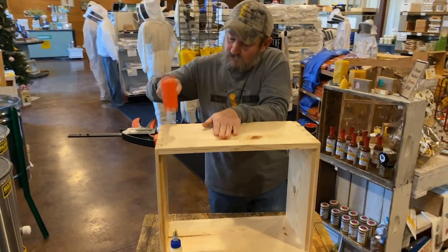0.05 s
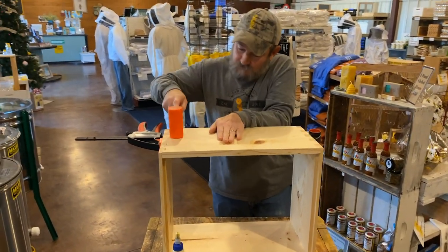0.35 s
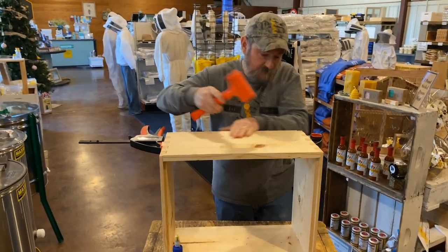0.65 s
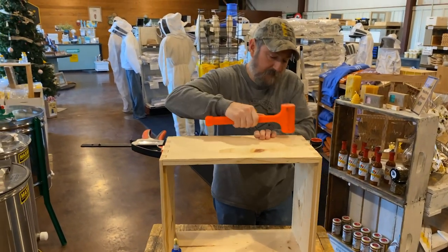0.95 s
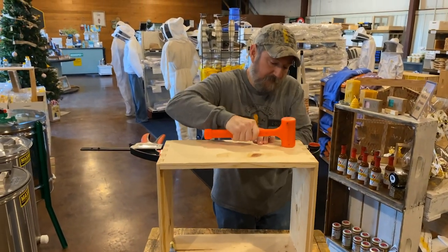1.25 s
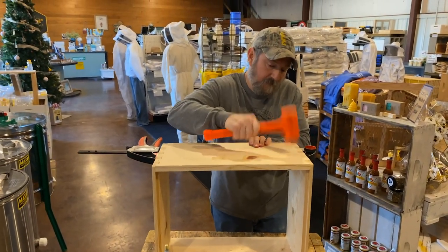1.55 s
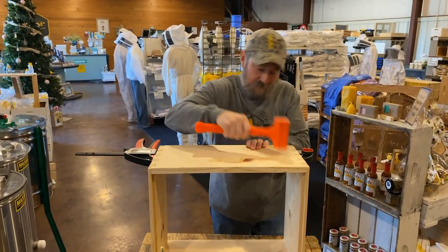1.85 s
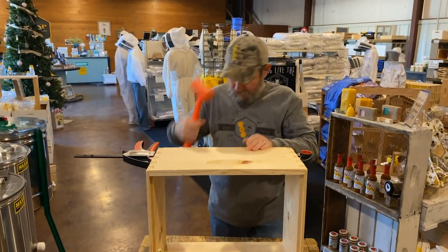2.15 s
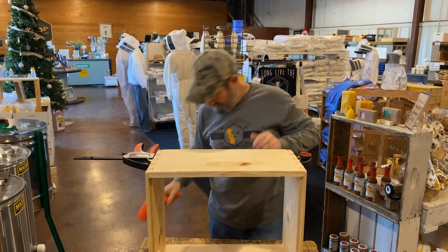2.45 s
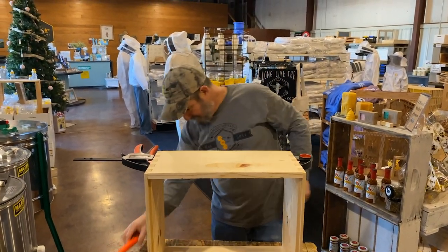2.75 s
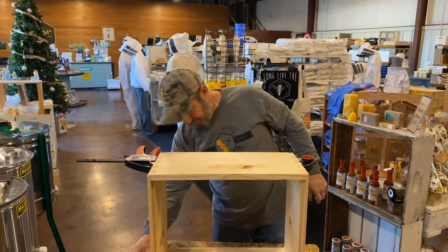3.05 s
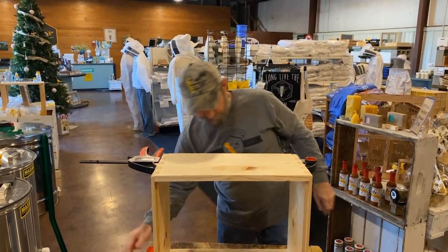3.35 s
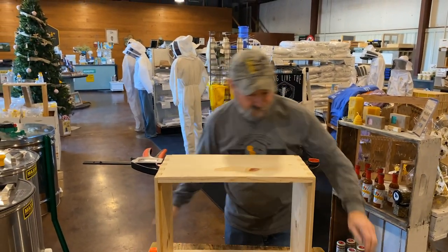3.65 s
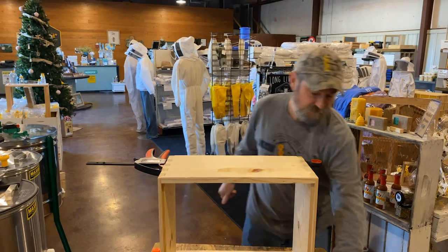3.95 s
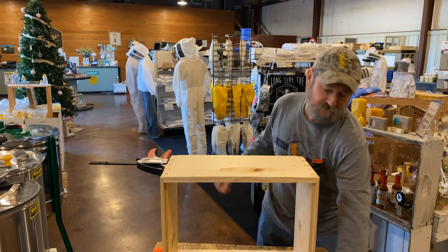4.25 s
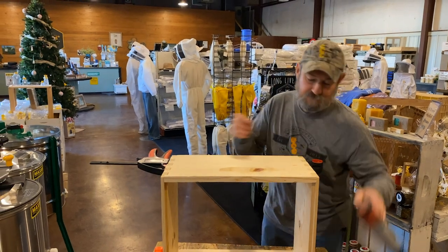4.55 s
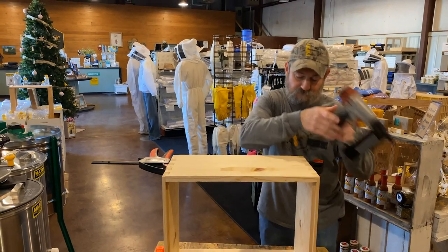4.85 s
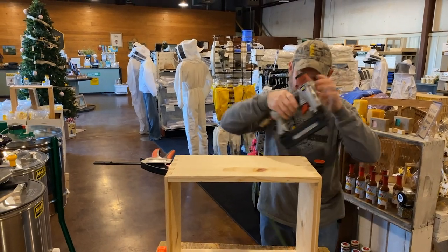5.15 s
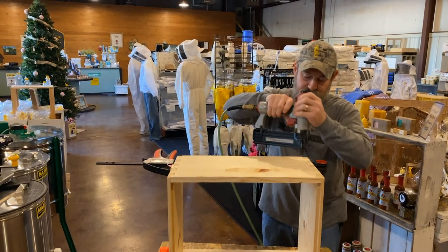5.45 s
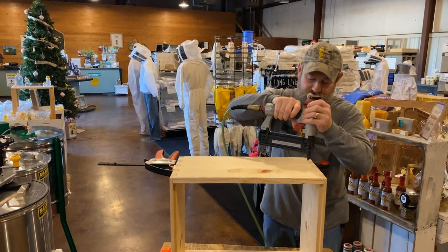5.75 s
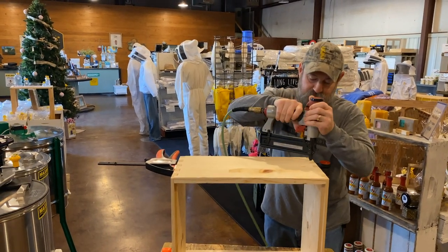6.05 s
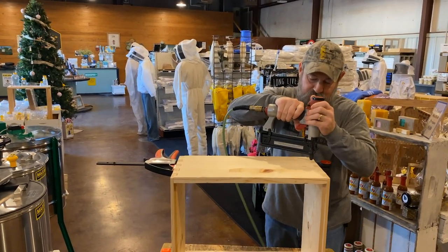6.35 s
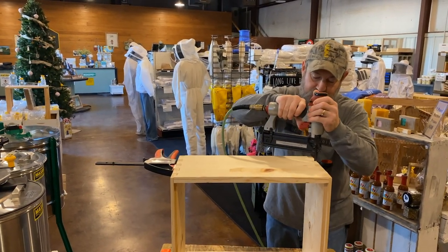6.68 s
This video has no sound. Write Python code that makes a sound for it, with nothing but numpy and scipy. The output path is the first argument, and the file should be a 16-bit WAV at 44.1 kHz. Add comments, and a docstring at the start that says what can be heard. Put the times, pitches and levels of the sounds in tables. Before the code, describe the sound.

Three mallet blows on wood, a rattling clunk as it is set down, and one sharp air stapler shot in a large room.

```python
"""Mallet and air stapler in a workshop

A shot-filled rubber mallet strikes a pine box three times, exciting its modes, and is laid on the bench.
An air stapler is lifted on its hose, pressed on the box and fired: valve hiss, driver blow, exhaust,
piston return. The hall adds reverberation and a far-wall echo over ventilation rumble, and the loud
blows overload the microphone."""
import sys
import numpy as np
from scipy import signal
from scipy.fft import rfft, irfft, next_fast_len
from scipy.io import wavfile

SR = 44100
rng = np.random.default_rng(int(sys.argv[2]) if len(sys.argv) > 2 else 0)


def int16_out(signal):
    """Quantize to a 16-bit WAV file."""
    q = np.round(np.clip(np.atleast_2d(signal).T, -1, 1) * 32767)
    wavfile.write(sys.argv[1], SR, q.astype(np.int16))


N = 296084
T = np.arange(N) / SR
AGE = T[:SR]  # seconds since an impact

# modes of the pine box: pitch_hz, t60_s, first_spot_db, second_spot_db, third_spot_db
BOX_MODES = [(132, 0.18, -1, -29.5, -26), (172, 0.45, -4.5, -13, -12), (191.4, .06, -7, -11, -14),
             (250, 0.11, 5, -8.5, -6.5), (305, .09, 0, -17, -7), (392, 0.088, -19.5, -5, -7),
             (490, 0.1, -12, -9, 1), (540, 0.1, -12, 1, -9.5), (590, 0.16, -7, -6, -9),
             (696, 0.16, -7, 1.5, -4), (732, 0.12, -17, -9, -5.5), (786, 0.1, -8, -10, -7.5),
             (879, .16, -18, -4.5, -19), (1084, 0.057, -4, -12.5, -13), (1356, 0.15, -17, -8, -8),
             (1670, 0.12, -13, -13.5, -7.5)]
# modes of the stapler's steel body: pitch_hz, t60_s, level_db
STEEL_MODES = [(1960, 0.026, 0.5), (2300, 0.027, -3.5), (3543, 0.025, 3), (4290, 0.025, -9),
               (7500, 0.021, -12), (8242, 0.028, -6)]
# spectrum of a small hard click: frequency_hz, level_db
CLICK_SPECTRUM = [(200, -16), (1000, -1.5), (3500, 3), (5000, -5), (8000, 0.5), (11000, -3.5),
                  (16000, -18.5)]


def undb(db):
    """Amplitude ratio of a level in decibels."""
    return 10 ** (np.asarray(db) / 20)


def fade(t, t60):
    """Exponential decay from t = 0, falling 60 dB in t60 seconds."""
    return (t >= 0) * np.exp(-np.log(1000) * np.maximum(t, 0) / t60)


def add(track, start_s, sound):
    """Superposition: a sound sums into the track from start_s on."""
    i = max(int(start_s * SR), 0)
    track[i:i + len(sound)] += sound[:len(track) - i]


def along(points, hz, axis=1):
    """Interpolation of a table column over log frequency."""
    points = np.array(points, float)
    return np.interp(np.log(np.maximum(hz, 1)), np.log(points[:, 0]), points[:, axis])


def noise(spectrum, size):
    """Spectral shaping of white noise, scaled to unit rms."""
    n = next_fast_len(size, True)
    gain = undb(along(spectrum, np.fft.rfftfreq(n, 1 / SR)))
    y = irfft(rfft(rng.standard_normal(n)) * gain, n)[:size]
    return y / y.std()


def split(x):
    """Complementary half-octave bands that sum to x, as (centre_hz, band) pairs."""
    centres = 44 * 2 ** np.arange(0, 9, .5)
    hz, whole = np.fft.rfftfreq(len(x), 1 / SR), rfft(x)
    return [(c, irfft(whole * np.interp(hz, centres, centres == c), len(x))) for c in centres]


def burst(spectrum, t60, damping, smoothing=0):
    """Dense modes decay like noise; t60 holds at 1 kHz and varies as frequency ** -damping."""
    t = AGE[:SR // 3]
    bands = split(noise(spectrum, len(t)))
    y = sum(band * fade(t, t60 * (1000 / hz) ** damping) for hz, band in bands)
    rms = y.std()
    hz = np.maximum(np.fft.rfftfreq(len(t), 1 / SR), 30)
    even = undb(along(spectrum, hz)) * (1000 / hz) ** (damping / 2)
    taper = np.clip(2 - 3 * t / t[-1], 0, 1)
    for _ in range(smoothing):  # modal overlap: in a large body no peak stands out
        phase = np.angle(rfft(y))
        y = irfft(even * np.exp(1j * phase), len(t)) * taper
    return y * rms / y.std()


def ring(modes):
    """Free vibration: damped sines of alternating sign, from rows of pitch_hz, t60_s, level_db."""
    return sum((-1) ** k * undb(db) * fade(AGE, t60) * np.sin(2 * np.pi * hz * AGE)
               for k, (hz, t60, db) in enumerate(modes))


def swell(start_s, length_s, db, attack_s=.045, release_t60=.28):
    """Envelope of a sustained excitation: linear rise, hold, exponential decay."""
    rise = np.clip((T - start_s) / attack_s, 0, 1)
    return undb(db) * rise * fade(np.maximum(T - start_s - length_s, 0), release_t60)


def stick_slip(per_s=35, spread_db=2):
    """Stick-slip friction: the gain of a rubbing contact wavers at random."""
    marks = np.arange(0, T[-1], 1 / per_s)
    return undb(spread_db * np.interp(T, marks, rng.standard_normal(len(marks))))


def background(vent_db=-35.5, hiss_db=-63.5, drop_db=9, drop_start_s=3.7, drop_length_s=1.2):
    """Broadband noise: steady ventilation rumble, and a thin hiss that sinks once."""
    # spectra of the ventilation and the hiss: frequency_hz, level_db
    vent = [(15, -58), (28, -25), (42, -3.5), (58, 1.5), (90, -3), (125, -9.5), (230, -15.5), (330, -25.5),
            (500, -31.5), (750, -33.5), (1500, -41.3), (3000, -42.3), (6000, -50.8), (16000, -59.5)]
    hiss = [(5000, -27.5), (8000, -9.5), (9000, -0.5), (9900, -3.5), (10600, -24), (14000, -17),
            (15000, -4.5), (16000, -22)]
    sunk = np.clip((T - drop_start_s) / drop_length_s, 0, 1)
    return undb(vent_db) * noise(vent, N) + undb(hiss_db - drop_db * sunk) * noise(hiss, N)


def hall(x, gap_s=.02, build_s=.022, near_t60=.57, echo_s=.18, echo_t60=.5):
    """Convolution with a room response: early scattering, diffuse decay and a smeared far-wall echo."""
    # reverberation of the hall: frequency_hz, t60_s, level_db
    reverberation = [(60, 1, -21.5), (170, 1.2, -8), (600, 0.92, -9), (2878, 0.8, -8.7), (5500, 0.74, -7.7),
                     (7800, 0.54, -7.5), (11000, 0.4, -10.5), (16120, .35, -16)]
    # reflections from floor and shelves: delay_s, level_db
    reflections = [(.015, -26), (.034, -21)]
    t = T[:SR * 3 // 2]
    response = np.zeros(len(t))
    since = np.maximum(t - gap_s, 0)
    build = np.clip(t / (gap_s + build_s), 0, 1) ** .7  # scattering thickens gradually
    for hz, band in split(rng.standard_normal(len(t))):
        t60, db = along(reverberation, hz), along(reverberation, hz, axis=2)
        near = undb(-1 - 6 * abs(np.log2(hz / 1000))) * fade(since, near_t60)
        absorption = fade(echo_s, t60)  # the long path dulls the echo
        echo = undb(4) * absorption * fade(t - echo_s, echo_t60)
        power = (near ** 2 + fade(since, t60) ** 2) * build ** 2 + echo ** 2
        response += undb(db) * band * np.sqrt(power * 2 * np.log(1000) / SR)
    for delay_s, db in reflections:
        add(response, delay_s, undb([db]))
    return signal.fftconvolve(x, response)[:N]


def handling(ticks_start_s=5.1, ticks_length_s=.7):
    """Friction and light impacts: the shifted box rumbles, a sleeve rustles, loose staples tick."""
    # spectra of the sliding box and the sleeve: frequency_hz, level_db
    rumble = [(20, -11), (35, -12), (60, -8), (110, -4.5), (180, -20), (400, -29.5), (2000, -56.5)]
    cloth = [(400, -8), (1500, -5), (2800, 0), (4500, -7), (8000, -21), (16000, -35)]
    out = noise(rumble, N) * swell(start_s=0, length_s=.2, db=-26.5, attack_s=.01, release_t60=.6)
    out += noise(cloth, N) * swell(start_s=5.65, length_s=.14, db=-52) * stick_slip()
    for when, softness in rng.random(size=(7, 2)):
        tick = undb(-53 - 8 * softness) * burst(CLICK_SPECTRUM, t60=.03, damping=.15)
        add(out, ticks_start_s + when * ticks_length_s, tick)
    return out


def hose(grip_t60=.035):
    """Friction excitation: the hose drags over the bench edge and drives the box's upper modes."""
    # friction spectra of the hose on the bench edge and on the box: frequency_hz, level_db
    on_edge = [(200, -2), (700, -1), (1300, 1.5), (1900, -6), (2400, -9), (2900, -4), (3150, 8.5),
               (3500, -19), (8000, -19.5), (16000, -32)]
    on_box = [(390, 7), (550, -10.5), (700, -8.5), (950, -7.5), (1600, -3.5), (3000, -8)]
    # brushes against the box: start_s, length_s, level_db
    brushes = [(4.115, .07, -44), (5.125, .17, -42.5)]
    body = ring([(hz, grip_t60, db) for hz, _, _, db, _ in BOX_MODES[4:]])
    rub = signal.fftconvolve(noise(on_box, N), body)[:N]
    pressure = sum(swell(*brush) for brush in brushes)
    drag = noise(on_edge, N) * swell(start_s=4.36, length_s=.61, db=-51, attack_s=.17, release_t60=.2)
    return (drag + rub / rub.std() * pressure) * stick_slip()


def thud(db):
    """Impulse response of the boards: low, damped modes answer a small contact."""
    # frequency_hz, level_db
    boards = [(80, -16), (190, -5), (280, 0), (380, -3), (550, -16), (1500, -40), (6000, -65)]
    return undb(db) * burst(boards, t60=.13, damping=.4)


def knocks(contact_s=.0014):
    """Impacts of loose objects: each excites a broad resonance over a thud of the boards."""
    # contacts on box, bench and floor: start_s, level_db, centre_hz, width_octaves, t60_s, thud_db
    contacts = [(0.013, -31, 1019, .85, .18, -45), (0.8182, -19, 1480, .8, .095, -39),
                (1.8265, -1.5, 2500, 1.05, .095, -22), (1.832, -12, 850, 1.1, .34, -25),
                (1.8784, -14.5, 5130, .65, .11, -35), (3.075, -30.5, 700, .6, .18, -20.5),
                (3.148, -27, 860, .3, .26, -38), (3.206, -21, 870, .35, .08, -28),
                (3.653, -39.5, 1300, .95, .08, -48), (4.04, -39.5, 5700, .5, .085, -60),
                (4.3137, -28.5, 2100, 1.15, .075, -44), (4.951, -23.5, 900, 1.1, .08, -41),
                (4.985, -34, 1100, 1.5, .1, -46)]
    out = np.zeros(N)
    hz = np.geomspace(30, 18000, 30)
    onset = 1 - np.exp(-AGE / contact_s)
    for start_s, db, centre_hz, octaves, t60, thud_db in contacts:
        hump_db = -30 * np.log1p((np.log2(hz / centre_hz) / octaves) ** 2 / 5)
        knock = undb(db) * burst(np.c_[hz, hump_db], t60, damping=.42) + thud(thud_db)
        add(out, start_s, knock * onset[:len(knock)])
    return out


def latches(seat_s=.0008, spring_s=4.966):
    """Impact excitation: the stapler's nose and trigger ring its body and bump the box; a spring pings."""
    # nose and trigger clicks: start_s, level_db, relative_ring_db, thud_db
    clicks = [(4.952, -35, -20, -50), (4.966, -35, -20, -41), (5.55, -46, -20, -60),
              (5.839, -26.5, -26, -36), (5.963, -35.5, -18, -50), (6.0455, -20, 1.5, -31),
              (6.058, -34, 3, -50), (6.265, -36, -16, -45)]
    out, steel = np.zeros(N), ring(STEEL_MODES)
    onset = 1 - np.exp(-AGE / seat_s)
    for start_s, db, ring_db, thud_db in clicks:
        click = undb(db) * burst(CLICK_SPECTRUM, t60=.034, damping=.15) + thud(thud_db)
        add(out, start_s, click * onset[:len(click)])
        add(out, start_s, undb(db + ring_db) * steel * onset)
    add(out, spring_s, ring([(12680, .22, -54)]))
    return out


def shot(spray_db=-3, shell_db=-7, scatter_db=2):
    """Granular impacts: pellets slide in the mallet head, spray against its wall, ring it and click."""
    # shot shifting and the head bouncing on the bench: start_s, level_db, relative_click_db
    rattles = [(0.156, -42, -10), (0.181, -28, -7), (1.207, -38, -7), (2.45, -49, -15),
               (3.1205, -13.5, -22), (3.155, -14.5, -30), (3.179, -16.5, -11), (3.214, -19, -20),
               (3.223, -15.5, -8), (3.257, -26, -20)]
    # spectra of sliding and of spraying pellets: frequency_hz, level_db
    slide = [(1500, -18), (2800, -0.5), (3500, 7), (4300, -9.5), (8000, -8), (16000, -18)]
    spray = [(200, -17), (900, -18), (1600, -16.5), (2400, -6.5), (3130, .5), (3600, -6), (4200, -20),
             (9000, -28), (16000, -45)]
    # modes of the hollow head: pitch_hz, t60_s, level_db
    shell = [(2400, 0.056, -5), (3000, 0.049, -2), (3210, .08, 0), (3600, .06, -3), (3580, 0.11, -4),
             (6900, 0.033, -15.5), (8750, .04, -16.5)]
    out = noise(slide, N) * swell(start_s=.56, length_s=.15, db=-47.3, attack_s=.07, release_t60=.8)
    scatter = scatter_db * rng.standard_normal((len(rattles), len(shell)))
    for (start_s, db, click_db), offsets_db in zip(rattles, scatter):
        modes = [(hz, t60, level + offset) for (hz, t60, level), offset in zip(shell, offsets_db)]
        add(out, start_s, undb(db + spray_db) * burst(spray, t60=.13, damping=.1))
        add(out, start_s, undb(db + shell_db) * ring(modes))
        add(out, start_s, undb(db + click_db) * burst(CLICK_SPECTRUM, t60=.015, damping=.14))
    return out


def air_jets(bleed_db=-23):
    """Turbulent flow: the valve fills the cylinder; the exhaust dumps it in a puff, then bleeds off."""
    # spectra of the valve and exhaust jets: frequency_hz, level_db
    valve = [(100, 6), (400, -14), (1500, -11), (3500, -5.5), (7000, 0.5), (10000, -1.5), (13000, -8),
             (15500, -8)]
    exhaust = [(100, -12), (400, -13), (900, -8), (2500, -8), (5000, -5.5), (7000, -4), (9300, -0.5),
               (12000, -5), (16000, -6)]
    filling = swell(start_s=6.2705, length_s=.01, db=-13, attack_s=.0025, release_t60=.2)
    puff = dict(start_s=6.416, length_s=.02, db=-2.8, attack_s=.005)
    emptying = swell(**puff, release_t60=.05) + undb(bleed_db) * swell(**puff, release_t60=.65)
    return filling * noise(valve, N) + emptying * noise(exhaust, N)


def stapler(drive_s=6.293, return_s=6.44, steel_db=-15):
    """Pneumatic impacts: the driver sinks the staple, the piston hits its stop; both ring the body."""
    # spectra of the driver and piston blows: frequency_hz, level_db
    driver = [(40, -11), (120, -1.5), (240, -1), (370, -9.5), (530, 2.5), (750, 0), (1150, -3.5),
              (1700, -14.5), (3500, -4), (4300, -14), (9000, -8), (16000, -15)]
    piston = [(60, -10), (220, 6.5), (400, -8), (800, 0), (1150, 9.5), (1650, 10.5), (2100, 6), (4000, 0.5),
              (9000, -3.5), (16000, -22)]
    # housing modes rung by the returning piston: pitch_hz, t60_s, level_db
    housing = [(1098, 0.11, -34), (1340, 0.13, -18), (1422, 0.32, -19), (1517, 0.24, -14.5),
               (1710, 0.11, -14)]
    out = air_jets()
    for start_s, db, t60, spectrum in ((drive_s, 3.6, .071, driver), (return_s, -.71, .057, piston)):
        add(out, start_s, undb(db) * burst(spectrum, t60, damping=.38, smoothing=2))
        add(out, start_s, undb(db + steel_db) * ring(STEEL_MODES))
    add(out, return_s, ring(housing))
    return out


def mallet(push_s=.002):
    """Modal excitation: the contact cracks, then rubber drives the box modes, weighted by strike spot."""
    # blows, each layer on its own relative scale: start_s, ring_db, thump_db, crack_db
    blows = [(0.2315, -4.5, 0.5, -0.5), (1.2505, -2.3, -2.2, 2.8), (1.6167, -4.3, -2, 3.3)]
    # spectra of the boards' dense short-lived modes and of the contact: frequency_hz, level_db
    thump_spectrum = [(40, -32), (110, -8.5), (220, -2.3), (450, -3.3), (700, 1), (1500, -5.7), (3000, -17),
                      (6000, -24), (16000, -50)]
    crack_spectrum = [(200, -27), (900, -10.5), (1800, 2.5), (3200, 5), (4500, -3.5), (7000, -4),
                      (10000, -14.5), (16000, -25)]
    out = np.zeros(N)
    push = 1 - np.exp(-AGE / push_s)
    for spot, (start_s, ring_db, thump_db, crack_db) in enumerate(blows):
        box = ring([(hz, t60, spots_db[spot]) for hz, t60, *spots_db in BOX_MODES])
        thump = burst(thump_spectrum, t60=.037, damping=.48, smoothing=4)
        crack = burst(crack_spectrum, t60=.02, damping=.6, smoothing=4)
        add(out, start_s, undb(ring_db - 2) * box * push)
        add(out, start_s, undb(thump_db + 11.5) * thump * push[:len(thump)])
        add(out, start_s, undb(crack_db + 10.5) * crack)
    return out


def scene():
    """Direct and reverberant fields add; each source sends its own share into the hall."""
    # sound, send_db
    sources = [(mallet(), -.4), (knocks(), -4), (shot(), -8), (stapler(), 2.5),
               (latches() + hose() + handling(), -3.3)]
    direct = sum(sound for sound, _ in sources)
    sent = sum(sound * undb(send_db) for sound, send_db in sources)
    return (direct + hall(sent) + background())[None]


def record(dry):
    """Overload: the microphone clips hard at full scale, then a low-pass cuts above 16 kHz."""
    lowpass = signal.ellip(8, .2, 60, 16000, fs=SR, output="sos")
    return signal.sosfilt(lowpass, np.clip(dry, -1, 1))


dry = scene()
out = record(dry)
int16_out(out)
```